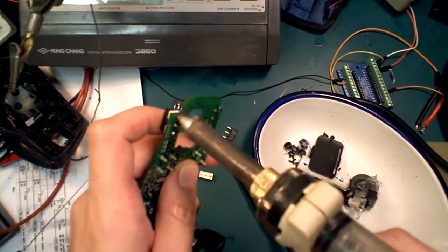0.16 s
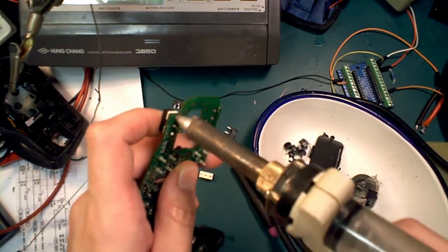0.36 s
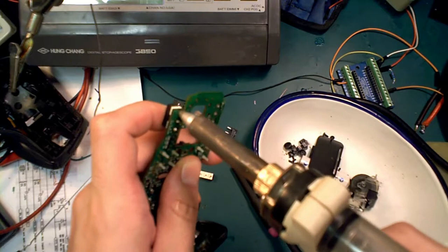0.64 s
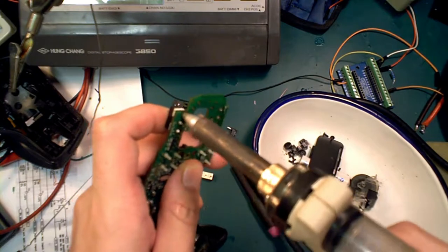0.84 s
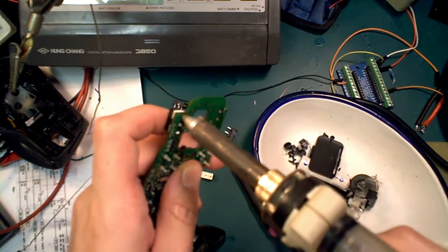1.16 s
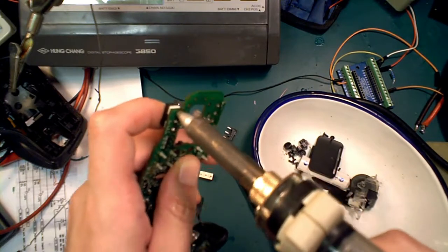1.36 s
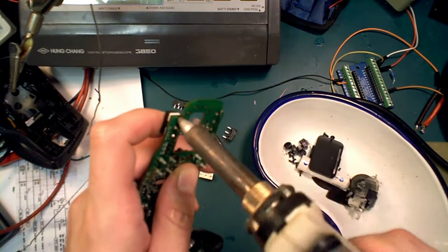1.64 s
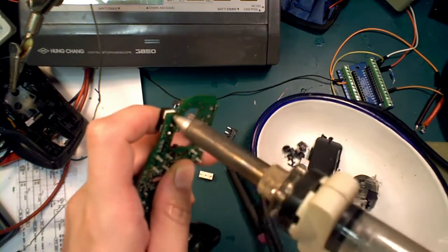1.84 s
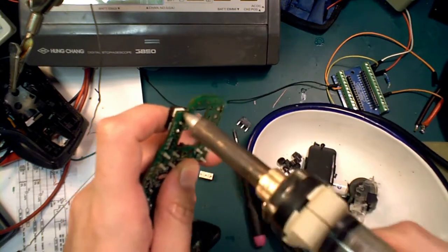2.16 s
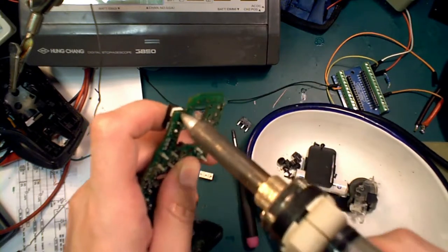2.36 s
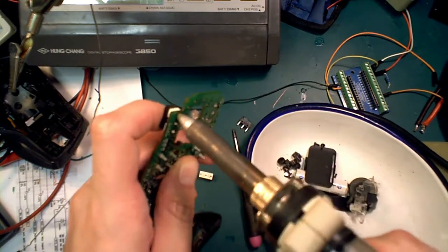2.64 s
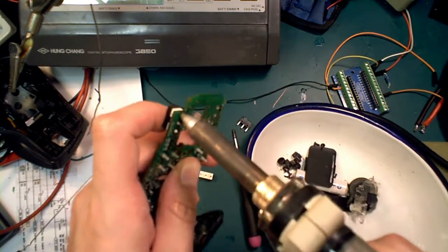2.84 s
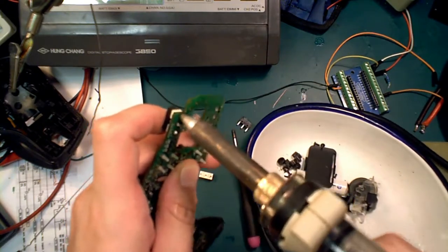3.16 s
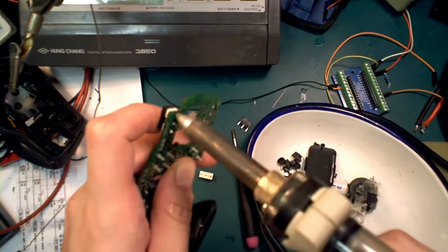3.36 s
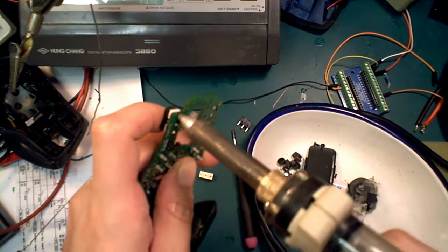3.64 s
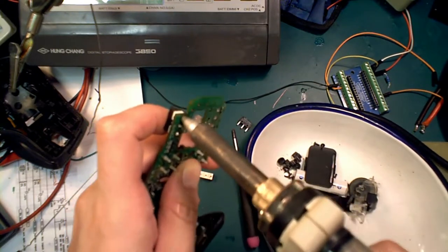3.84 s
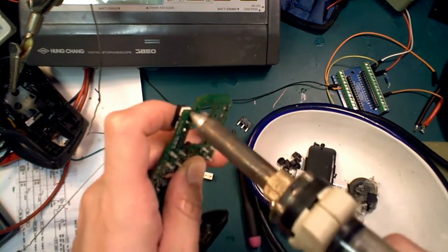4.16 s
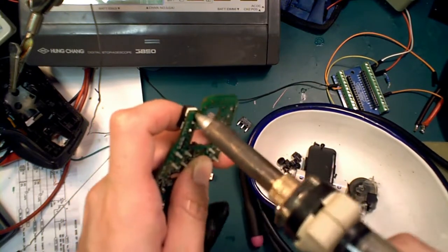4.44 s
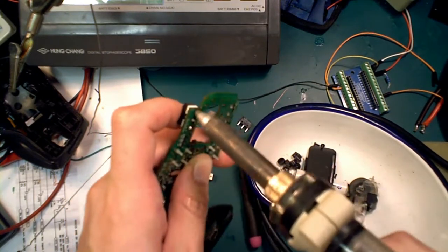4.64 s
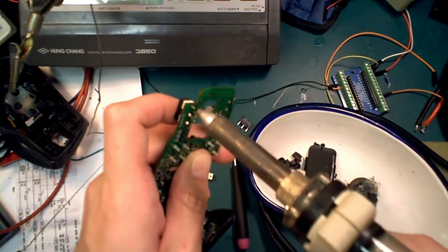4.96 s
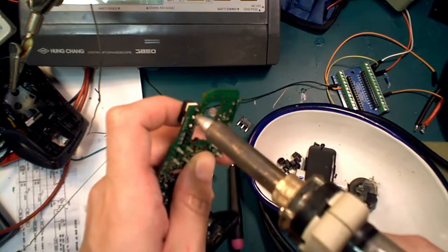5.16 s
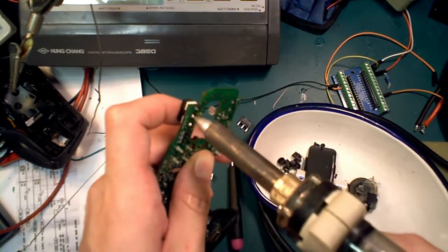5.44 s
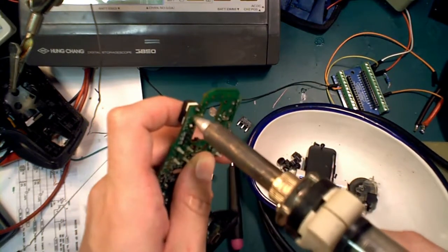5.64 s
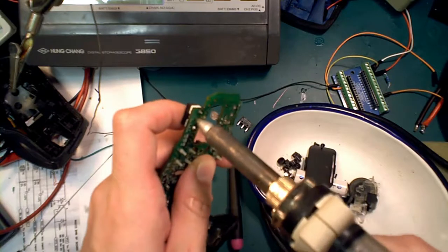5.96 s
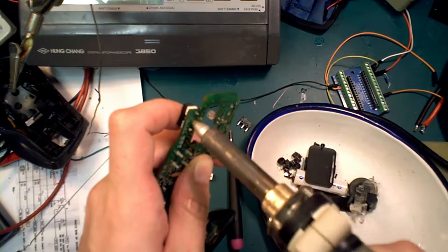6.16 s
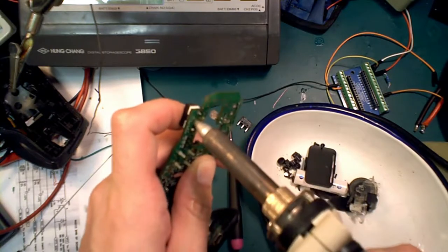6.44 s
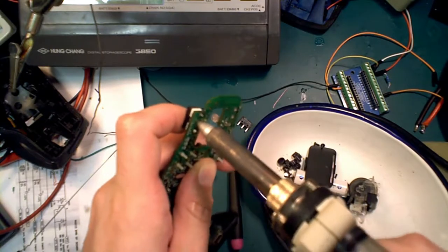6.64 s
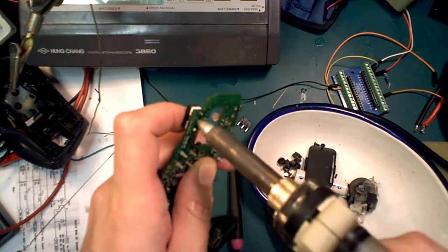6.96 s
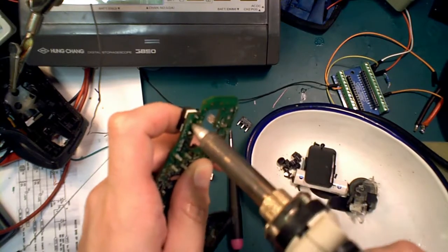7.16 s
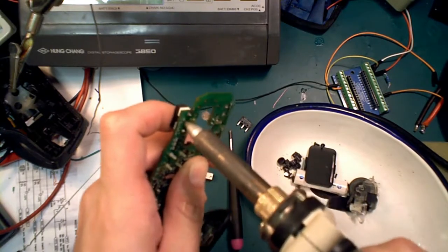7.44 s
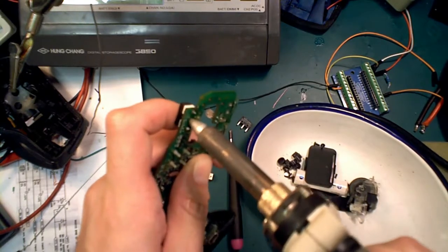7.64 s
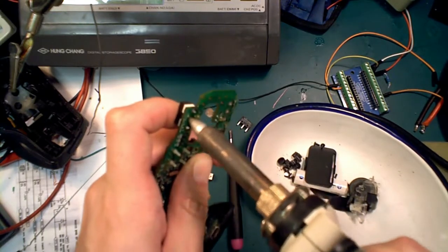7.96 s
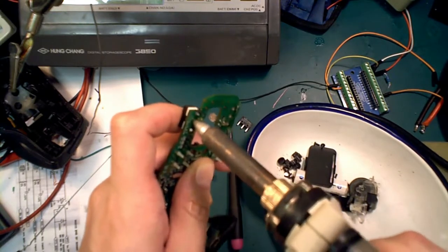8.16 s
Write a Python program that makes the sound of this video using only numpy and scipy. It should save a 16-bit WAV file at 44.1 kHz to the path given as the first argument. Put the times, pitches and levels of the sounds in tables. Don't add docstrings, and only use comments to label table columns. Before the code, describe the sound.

A steady, soft fan noise with faint mains hum fills a small workshop, heard closely above the bench. A light knock at 0.2 s is the tool being gripped; a sharp trigger click at 0.67 s is followed by a thud, and a small pump spins up within a fraction of a second into a harsh, rattling buzz of about eighty strokes a second, with plastic casing clatter and bright pulsing hiss. Its pitch creeps slightly upward, its buzz coarser until nearly 3 s; sharp tip jolts come at 0.8-0.9 and 1.7-1.8 s. At 4.85 s it clicks off, collapsing in a few dull strokes and a faint air leak until about 5.1 s. Quiet fan remains. From 6.1 s, delicate metallic ticks and handling knocks lead to another click at 6.7 s. The pump restarts and runs to the end, with jolts, crumbs, thin sizzle and spitting.

```python
import sys
import numpy as np
from scipy import signal
from scipy.fft import rfft, irfft, next_fast_len
from scipy.io import wavfile
from scipy.ndimage import uniform_filter1d

SR = 44100
rng = np.random.default_rng(int(sys.argv[2]) if len(sys.argv) > 2 else 0)


def store_pcm(level_fs):
    pcm = np.round(np.clip(level_fs, -1, 1) * 32767).astype(np.int16)
    wavfile.write(sys.argv[1], SR, np.atleast_2d(pcm).T)


def ratio(d):
    e = np.asarray(d, float) / 20
    return 10 ** e


N = 366471

# f/Hz, density/dB
ROOM = [(24, -52), (90, -33), (140, -27), (185, -17), (260, -11), (340, -5.5), (556, -7.5), (770, -8),
        (1270, -9.5), (2570, -10), (2840, -17), (3380, -14.5), (7540, -18.5), (10500, -31.5), (16000, -45)]
# f/Hz, width/Hz, level/dB
FAN_CASE = [(369, 28, 1.5), (440, 12, -5), (478, 17, -8), (620, 18, -4.5), (776, 11, 4), (1102, 10, 0),
            (1198, 21, -3), (1431, 12.5, 6.5), (1535, 25, 2.5), (1946, 64, -2.5), (2355, 17, -2.5),
            (3460, 180, -6.5), (5000, 110, -3), (9500, 400, -2)]
# multiple of the mains, rms level/dB
HUM = [(1, -100), (2, -77.5), (3, -72.5), (4, -66.5), (4.4, -76), (5, -63), (6, -71.5)]
ROOM_DB, MAINS_HZ = -49.5, 49.9
# t/s, peak level/dB, f/Hz, width [share of f], t60/s
KNOCKS = [
    (0.2012, -38, 2900, .9, .015),
    (6.146, -37, 3200, 0.97, .012),
    (6.641, -35.5, 4370, 0.62, 0.024),
    (6.6500, -47, 5200, .3, .02),
    (6.6560, -44, 4000, .4, 0.018),
    (6.6650, -41, 3900, .3, .025),
]
# t/s, peak level/dB, brightness [dB per octave]
TRIGGER = [
    (.6635, -37, -5),
    (.6650, -33, 9),
    (0.6666, -19.5, -5),
    (4.85, -24.5, 2),
    (4.8744, -36, -2),
    (6.6960, -35.5, -13.5),
    (6.699, -27.5, 4),
]
# f/Hz, width [share of f], level/dB, t60/s
SWITCH = [(1510, 0.94, -20.5, 0.034), (4000, 0.57, -0.5, 0.011), (6700, .35, -1, 0.016),
          (10500, .9, -9.5, .007)]
# t/s, peak level/dB, f/Hz, width [share of f], t60/s
END_STROKES = [
    (.689, -38, 2460, 1.7, 0.089),
    (4.875, -32, 2800, .7, .015),
    (4.897, -37, 3000, .5, .015),
    (4.936, -29, 1000, .8, .015),
    (0.703, -28, 1240, 0.63, .04),
    (0.7075, -41, 1280, 0.99, 0.035),
    (6.7248, -28.5, 1070, 0.62, 0.037),
    (6.7480, -41, 1190, 0.72, 0.04),
    (6.7508, -26, 1380, 1.3, 0.022),
]
# motor start t/s, power off t/s, rattle level/dB, air level/dB, slow part of spin-up [turns/s]
BURSTS = [
    (.697, 4.865, -33, -43, 9),
    (6.721, 8.6, -32.5, -42.5, 11.5),
]
# t/s, speed [turns/s]
FULL_SPEED = [(1.2, 81.05), (1.6, 81.25), (2.05, 81.1), (2.2, 81.65), (2.65, 81.6), (2.8, 82.05),
              (3.25, 82.55), (3.7, 82.7), (4.1, 83.05), (4.35, 82.85), (7.2, 83.05), (8.05, 83.4),
              (8.31, 83.25)]
QUICK_GAP, QUICK_S, SLOW_S = 29, .068, .165
COAST_PER_S2 = 108
ATTACK_S, SOFT_START_DB, SOFT_START_S = 0.0086, -6, 0.056
RATTLE_FALL_DB_S, AIR_FALL_DB_S, PUSH_FALL_DB_S = 175, 110, 208
ENGAGE_S, FIRST_TURN_DB = .026, -5.5
BRIGHT_FALL_DB_S = 60
# speed [turns/s], levels of 2nd, 3rd and 4th order/dB
PUSH = [(45, -70, -64, -52), (57.3, -61, -56, -57), (67.8, -50, -42, -49.5), (73, -51, -42, -41),
        (76.8, -55, -47.5, -39), (76.8, -53, -38, -35), (80.7, -41, -38.5, -39),
        (81.3, -41.5, -36.5, -37.5), (83.03, -45.5, -39, -37.5), (83.14, -46.5, -41.5, -39)]
PUSH_SKEW = 1.0
SLAP_LEAD = .4
# t/s, share locked [0-1]
LOCK = [
    (.95, 0.2),
    (1.15, .85),
    (2.0, .8),
    (2.8, 0.64),
    (2.9, 0.3),
    (3.5, 0.4),
]
# multiple of the speed, level over the rattle when locked/dB, when free/dB
SHAFT_ORDERS = [(1, -47, -38), (5, -39, -17), (6, -31, -38), (7, -16, -23), (8, -27, -20),
                (9, -11.5, -28.5), (9.67, -17, -41), (10, -23, -29), (10.67, -22, -27), (11, -32, -15),
                (11.67, -5, -22), (12, -17, -4), (12.67, -15, -23), (13, -13, -8.5), (13.67, -9, -34),
                (14, -40, -50), (16, -29, -20), (20, -13, -27), (21.2, -18, -46), (23.14, -9, -38),
                (25.09, -32, -16), (28.6, -31, -21)]
# time after start/s, level over the rattle/dB
PULL_UP = [
    (0, -3),
    (.08, -1),
    (.42, -10.5),
    (.52, -42),
]
# f/Hz, width/Hz, level/dB
MOUNT = [(769, 44, -1.5), (950, 25, -9), (1000, 84, -2), (1066, 48, 6.5), (1410, 44, -14)]
# f/Hz, width/Hz, level/dB
CASING = [(374, 16, -5), (462, 30, -9), (780, 76, -12), (887, 29, -3), (948, 27, -5.5), (1028, 24, -4),
          (1085, 19, -1.5), (1155, 36, -9), (1378, 49, -6), (1437.5, 11.5, -0.5), (1780, 110, -11.5),
          (1945, 43, -7), (2092, 60, -3.5), (2380, 45, -3.5), (2563, 130, -7), (2957, 105, -4),
          (3142, 113, -6.5), (3354, 65, -1.5)]
# f/Hz, density/dB
RATTLE = [(24, -78), (40, -45), (108, -31), (152, -11), (327, 0.5), (520, -20.5), (954, 5), (1610, -1.5),
          (3270, -16), (5000, -40), (6500, -50), (11000, -120)]
# f/Hz, width/Hz, level/dB, strike point [share of a turn], fall [dB per turn]
NOZZLE = [(4430, 27, -24, 0.4, 7), (4584, 76, 1.5, 0.11, 17), (4890, 150, -8, 0.24, 15),
          (5064, 160, -6.5, 0.27, 11), (5480, 140, -3, 0.14, -2), (6280, 81, -4, 0.17, 10),
          (6480, 120, 0.5, 0.18, -17), (6790, 92, 4.5, 0.043, 4), (7400, 250, 3, 0.45, 32),
          (7860, 90, -22, .5, 6), (8380, 72, -5.5, .5, 1), (8700, 170, -15, 0.41, -2),
          (9380, 57, -1.5, 0.47, 0)]
# f/Hz, density/dB
HISS = [(2120, -21), (3600, -2.5), (4680, 0), (5860, -4.5), (7520, -5), (8100, -8.5), (9770, -9.5),
        (10500, -17), (16000, -24)]
WALL_CUT_HZ, BENCH_T60_S, BENCH_DB = 2500, 0.45, -8
# t/s, peak level/dB, f/Hz, width [share of f], t60/s
JOLTS = [(0.7864, -29, 7960, 0.84, .01), (0.9088, -25, 5440, 0.2, 0.026), (.9093, -29, 7800, .6, 0.017),
         (1.7215, -37, 8900, .12, 0.028), (1.7300, -33.5, 7400, 0.045, .06), (1.7400, -37, 8700, .08, .03),
         (1.8366, -22.5, 7400, 0.81, 0.0073), (1.8357, -41, 13000, 0.46, 0.0071),
         (6.8124, -23, 6450, 0.8, 0.008), (7.0908, -26, 8000, 0.98, .01),
         (7.1305, -26.5, 7500, 0.65, 0.0092)]
# t/s, level/dB
GASP = [
    (5.065, -55.5),
]
LEAK_DB, LEAK_FALL_DB_S = -52.5, 57
# t/s, peak level/dB, f/Hz
TICKS = [(6.0851, -49, 9500), (6.1714, -43, 13200), (6.2677, -47, 8600), (6.321, -51, 7690),
         (6.3475, -54, 8990), (6.361, -42.5, 9100), (6.4433, -49, 7830), (6.5056, -45, 8550),
         (6.5585, -46, 9200), (6.5874, -50, 8620), (6.6223, -47, 8720), (6.6468, -49, 8630),
         (6.6657, -47, 9030), (7.01, -36, 8970), (7.9194, -40, 7600)]
# t/s, peak level/dB, f/Hz
FLUX_TICKS = [(6.0851, -58, 10600), (6.2657, -55, 13000), (6.2794, -60, 13000), (6.5051, -56, 10800),
              (6.5779, -64, 12800), (6.5884, -60, 14600), (6.6358, -54, 10900), (6.6494, -56, 10700),
              (6.6594, -57, 11000), (7.4544, -42, 11100), (7.4864, -37, 11800), (7.5453, -44, 11700),
              (7.7243, -45, 11400)]
TICK_SHARE, TICK_T60_S = 0.11, .02
SPIT_SHARE, SPIT_T60_S = .2, .015
SIZZLE_S, SIZZLE_DB = 6.76, -62.5
# t/s, level/dB
SPITS = [
    (6.812, -58),
    (6.912, -55),
    (7.092, -57),
    (7.24, -55),
    (7.5, -60),
]
FLARE_S = 0.013
# t/s, peak level/dB, f/Hz
CRUMBS = [
    (6.803, -33, 6000),
    (6.817, -28, 7000),
    (6.866, -33, 5500),
    (6.915, -34, 6500),
    (6.957, -33, 8000),
]


def rms_one(x):
    return x / np.sqrt(np.mean(x ** 2) + 1e-20)


def drift(rate):
    r = np.exp(-80 * np.pi * rate / SR)
    slow = signal.lfilter([1], [1, -2 * r, r * r], rng.standard_normal(N // 40 + 2002))[2000:]
    return np.interp(np.arange(N) / 40, np.arange(len(slow)), rms_one(slow))


def curve(rows):
    t = np.arange(N) / SR
    s, *columns = np.transpose(rows)
    return [np.interp(t, s, c) for c in columns], (t >= s[0]) & (t <= s[-1])


def resonance(x, hz, width):
    r = np.exp(-np.pi * width / SR)
    poles = [1, -2 * r * np.cos(2 * np.pi * hz / SR), r * r]
    return signal.lfilter([(1 - r * r) / 2, 0, (r * r - 1) / 2], poles, x)


def body(x, modes):
    return sum((-1) ** k * ratio(db) * resonance(x, hz, width) for k, (hz, width, db) in enumerate(modes))


def colour(x, spectrum):
    size = next_fast_len(N)
    hz, db = np.transpose(spectrum)
    bins = np.maximum(np.arange(size // 2 + 1), 1) * SR / size
    gain = ratio(np.interp(np.log(bins), np.log(hz), db))
    return irfft(rfft(x, size) * gain, size)[:N]


def grit(spread_db):
    return rng.standard_normal(N) * ratio(spread_db * np.minimum(rng.exponential(1, N), 5))


def clicks(rows):
    out, t = np.zeros(N + 4000), np.arange(4000) / SR
    noises = rng.standard_normal((len(rows), 4000))
    for (s, peak_db, hz, share, t60), noise in zip(rows, noises):
        width = hz * max(share, .03)
        dying = noise * ratio(-60 * t / max(t60, .003))
        burst = resonance(resonance(dying, hz, width), hz, width)
        at = round(s * SR)
        out[at:at + 4000] += ratio(peak_db) * burst / np.abs(burst).max()
    return out[:N]


def flares(rows):
    t = np.arange(N) / SR
    return sum(ratio(db) * np.exp(-((t - s) / FLARE_S) ** 2) for s, db in rows)


def band_hiss(gain, hz, width, patchy_db):
    hiss = rms_one(resonance(resonance(grit(1.6), hz, width), hz, width))
    return gain * ratio(patchy_db * drift(14.0)) * hiss


def room():
    air = rng.standard_normal(N) + ratio(7.5) * body(rng.standard_normal(N), FAN_CASE)
    fan = rms_one(colour(air, ROOM)) * ratio(ROOM_DB + .5 * drift(2.9))
    cycles = MAINS_HZ * np.arange(N) / SR
    hum = 0
    for k, db in HUM:
        multiple = round(5 * k) / 5
        hum = hum + ratio(db) * np.sqrt(2) * np.sin(2 * np.pi * (multiple * cycles + rng.random()))
    return fan + hum


def knocks():
    return clicks(KNOCKS)


def trigger():
    pivot_hz = SWITCH[1][0]
    return clicks([(s, db + mode_db + bright * np.log2(hz / pivot_hz), hz, share, t60)
                   for s, db, bright in TRIGGER for hz, share, mode_db, t60 in SWITCH])


def end_strokes():
    return clicks(END_STROKES)


def pump_controls():
    t = np.arange(N) / SR
    columns = np.transpose(BURSTS)
    burst = np.maximum(np.searchsorted(columns[0], t) - 1, 0)
    start, stop, rattle_db, air_db, slow_gap = columns[:, burst]
    since, off = np.maximum(t - start, 0), np.maximum(t - stop, 0)
    (full,), _ = curve(FULL_SPEED)
    missing = QUICK_GAP * np.exp(-since / QUICK_S) + slow_gap * np.exp(-since / SLOW_S)
    speed = np.maximum(full - missing - COAST_PER_S2 * off, 20)
    turns = np.cumsum(speed) / SR
    attack = np.minimum(since / ATTACK_S, 1)
    bright = ratio(FIRST_TURN_DB * (since < ENGAGE_S) - BRIGHT_FALL_DB_S * off)
    at, *orders = np.transpose(PUSH)
    push = [attack * ratio(np.interp(speed, at, db) - PUSH_FALL_DB_S * off) for db in orders]
    soft_db = SOFT_START_DB * np.exp(-since / SOFT_START_S)
    rattle = attack * ratio(rattle_db + soft_db - RATTLE_FALL_DB_S * off)
    air = attack * bright * ratio(air_db - AIR_FALL_DB_S * off)
    return turns, speed, since, push, rattle, air, bright


def diaphragm(turns, speed, push):
    thump = sum(level * np.sqrt(2) * np.cos(2 * np.pi * k * turns + PUSH_SKEW)
                for k, level in zip((2, 3, 4), push))
    return thump * (speed / 83) ** 1.8


def stroke(turns, lead, fall_db, uneven_db):
    late = turns + lead
    strength = rng.standard_normal(int(late[-1]) + 2)[late.astype(int)]
    return uniform_filter1d(ratio(uneven_db * strength - fall_db * (late % 1)), size=40)


def shaft_orders(turns, speed, lock):
    starts = rng.random(len(SHAFT_ORDERS))
    for i, (k, *_) in enumerate(SHAFT_ORDERS):
        if k % 1 == 0:
            starts[i] = k * SLAP_LEAD
    starts[:2] = PUSH_SKEW / (2 * np.pi)
    lines = 0
    for (k, locked_db, free_db), start in zip(SHAFT_ORDERS, starts):
        level = ratio(free_db + lock * (locked_db - free_db) + 0.63 * drift(3.6))
        lines = lines + level * np.cos(2 * np.pi * (round(3 * k) / 3 * turns + start))
    return np.sqrt(2) * lines * (speed / 83) ** 9.0


def hard_strokes(turns):
    ramp = uniform_filter1d((turns + 0.453) % 1, size=12)
    return rms_one(body(np.diff(ramp, prepend=0), MOUNT))


def looped(turns, count):
    steps = 500 * count
    noise = rng.standard_normal(steps + 1)
    return rms_one(np.interp(turns / count % 1 * steps, np.arange(steps + 1), noise))


def casing(turns, bright, lock):
    repeat = np.clip(0.22 * lock, 0, 1)
    gate = stroke(turns, lead=0.479, fall_db=10.5, uneven_db=0.35)
    loose = rms_one(grit(2.13) * gate)
    locked = rms_one(looped(turns, count=3) * gate)
    low = body(np.sqrt(repeat) * locked + np.sqrt(1 - repeat) * loose, CASING[:10])
    clatter = colour(rms_one(grit(1.7) * gate), RATTLE)
    high = body(loose, CASING[10:]) + ratio(-12) * clatter
    return rms_one(low + high * bright)


def nozzle(turns):
    air = rms_one(grit(2.6))
    rings = 0
    for hz, width, db, lead, fall_db in NOZZLE:
        gate = rms_one(stroke(turns, lead, fall_db, uneven_db=0.5))
        rings = rings + ratio(db) * resonance(air * gate, hz, width)
    puffs = rms_one(colour(grit(1.5) * stroke(turns, lead=.52, fall_db=7.0, uneven_db=1.2), HISS))
    return rms_one(puffs + ratio(10.5) * rings)


def walls(x):
    t = np.arange(SR // 2) / SR
    tail = rng.standard_normal(len(t)) * ratio(-60 * t / BENCH_T60_S) * (t > .002)
    tail = signal.lfilter(*signal.butter(1, WALL_CUT_HZ, fs=SR), tail)
    tail = ratio(BENCH_DB) * tail / np.sqrt(np.sum(tail ** 2))
    return (x + signal.fftconvolve(x, tail)[:N]) / np.sqrt(1 + ratio(2 * BENCH_DB))


def pump():
    turns, speed, since, push, rattle, air, bright = pump_controls()
    (lock,), _ = curve(LOCK)
    lock = np.clip(lock, 0, 1)
    stroke_db = np.interp(since, *np.transpose(PULL_UP))
    rattling = ratio(-2.0) * rattle * casing(turns, bright, lock)
    blowing = ratio(-0.04) * air * (speed / 83) ** 0.43 * nozzle(turns)
    tones = shaft_orders(turns, speed, lock) + ratio(stroke_db) * hard_strokes(turns)
    return diaphragm(turns, speed, push) + rattle * tones + walls(rattling + blowing)


def jolts():
    return clicks(JOLTS)


def leak():
    off = np.arange(N) / SR - BURSTS[0][1]
    bleeding = (off > 0) * ratio(LEAK_DB - LEAK_FALL_DB_S * np.abs(off))
    return band_hiss(bleeding + flares(GASP), hz=5200, width=920, patchy_db=-1.0)


def ticks():
    tip = [(*row, TICK_SHARE, TICK_T60_S) for row in TICKS]
    flux = [(*row, SPIT_SHARE, SPIT_T60_S) for row in FLUX_TICKS]
    return clicks(tip + flux)


def sizzle():
    boiling = np.arange(N) / SR > SIZZLE_S
    return band_hiss(boiling * ratio(SIZZLE_DB), hz=11700, width=1100, patchy_db=0.5)


def spatter():
    spits = band_hiss(flares(SPITS), hz=12500, width=6000, patchy_db=2.5)
    return spits + clicks([(*row, .9, .009) for row in CRUMBS])


def scene():
    contacts = knocks() + trigger() + end_strokes() + jolts() + ticks()
    return (room() + contacts + pump() + leak() + sizzle() + spatter())[None]


def top_cut(x):
    return signal.sosfilt(signal.butter(12, 16510, fs=SR, output="sos"), x)


def record(dry):
    low_pass = signal.ellip(12, .5, 70, 15780, fs=SR, output="sos")
    return top_cut(signal.sosfilt(low_pass, dry))


dry = scene()
out = record(dry)
store_pcm(out)
```